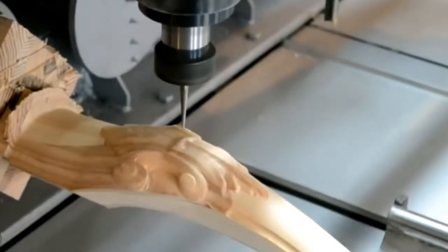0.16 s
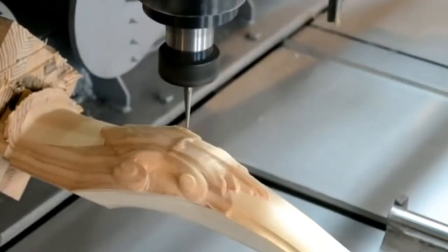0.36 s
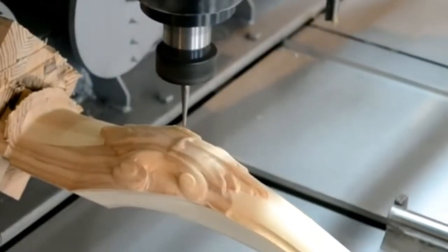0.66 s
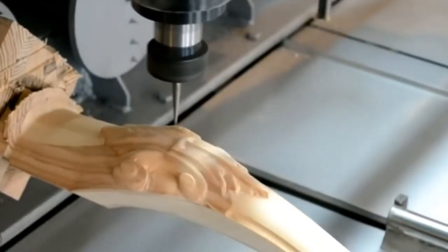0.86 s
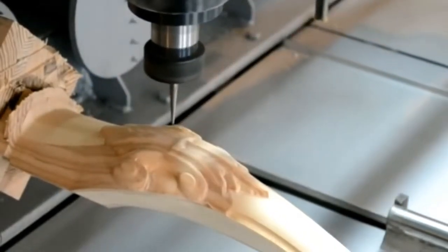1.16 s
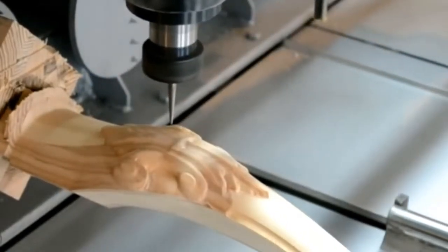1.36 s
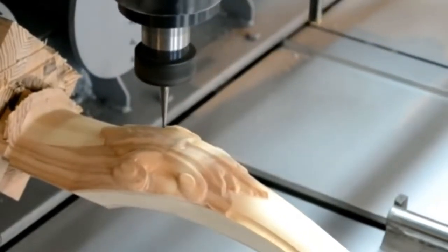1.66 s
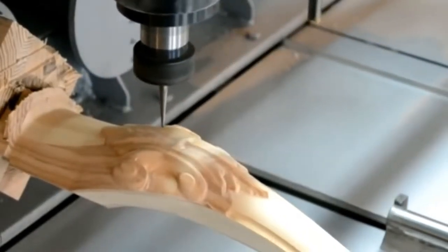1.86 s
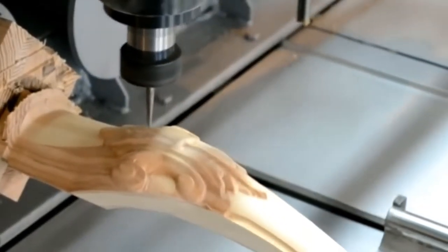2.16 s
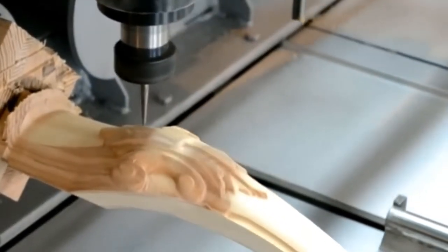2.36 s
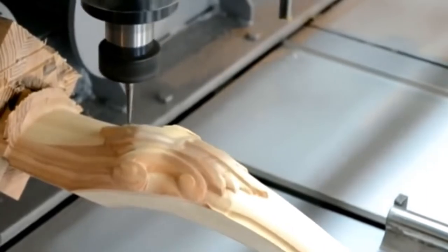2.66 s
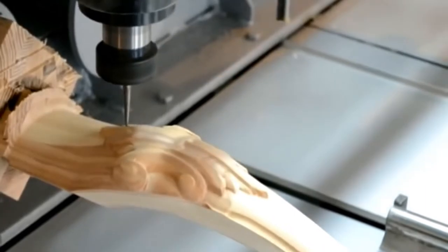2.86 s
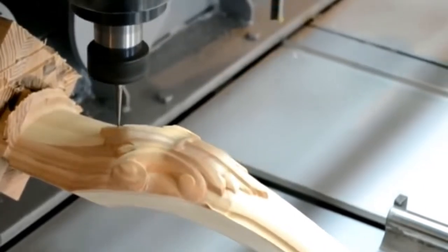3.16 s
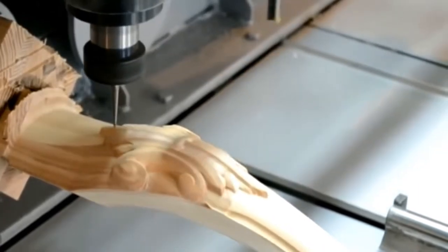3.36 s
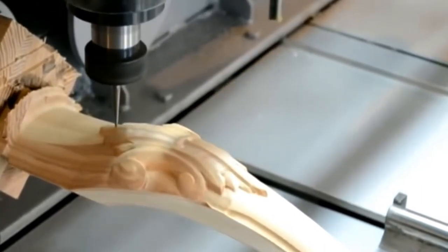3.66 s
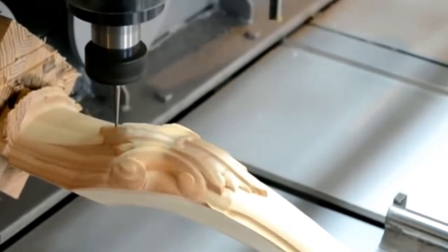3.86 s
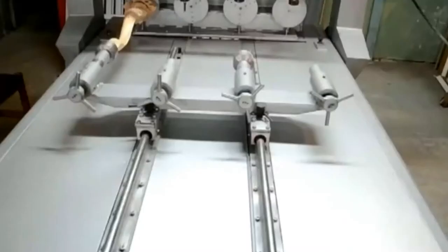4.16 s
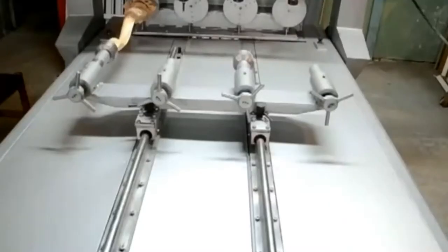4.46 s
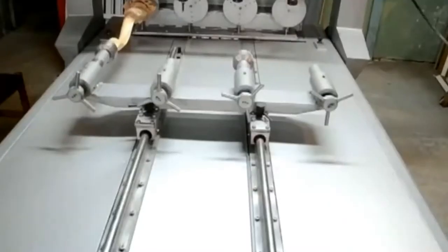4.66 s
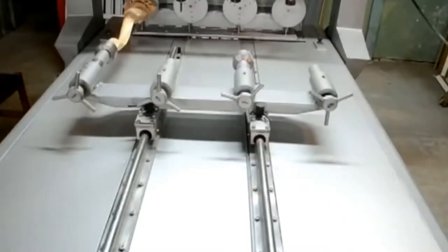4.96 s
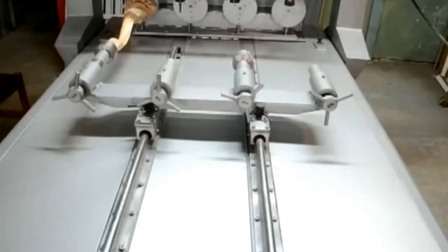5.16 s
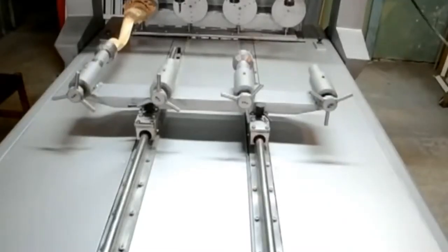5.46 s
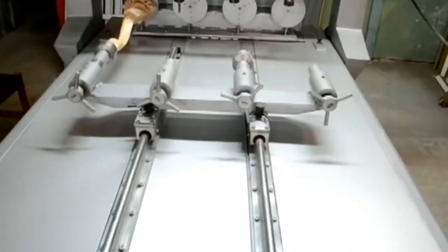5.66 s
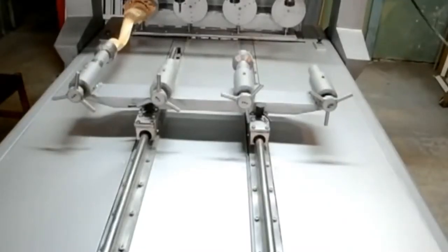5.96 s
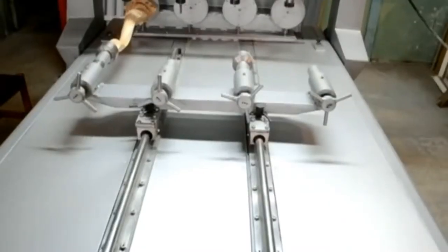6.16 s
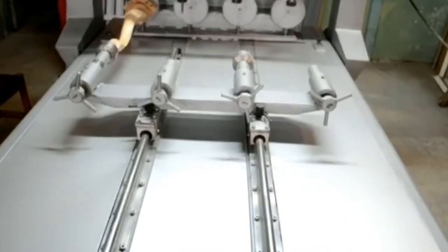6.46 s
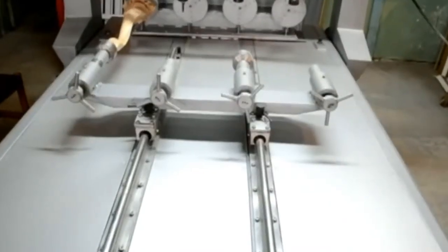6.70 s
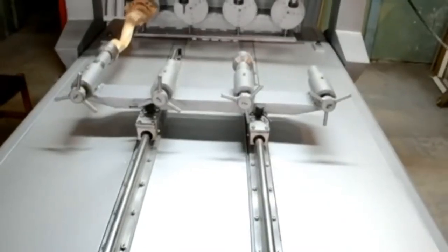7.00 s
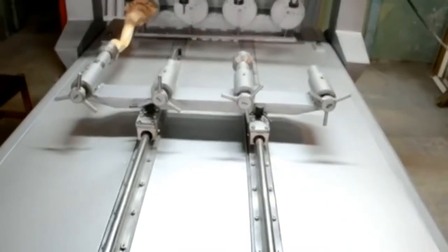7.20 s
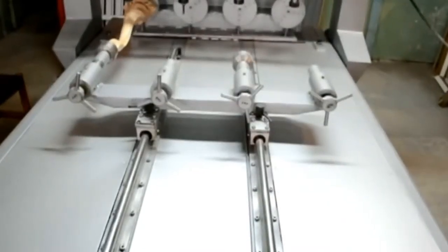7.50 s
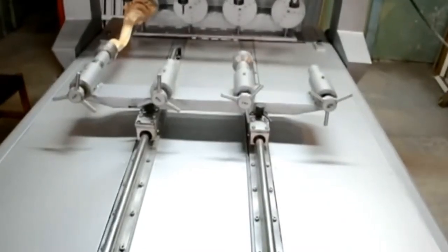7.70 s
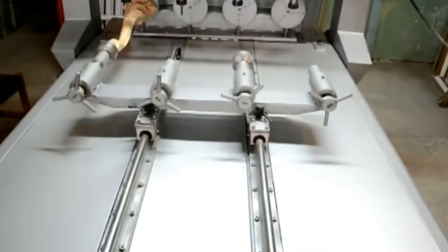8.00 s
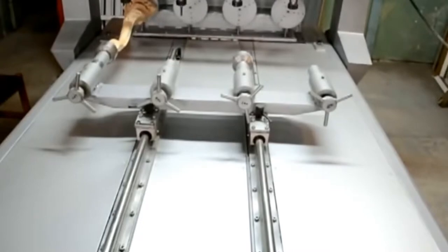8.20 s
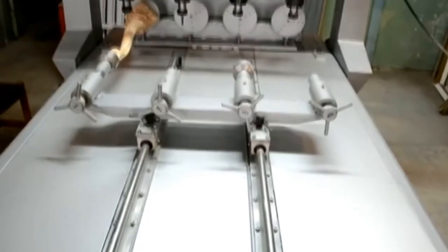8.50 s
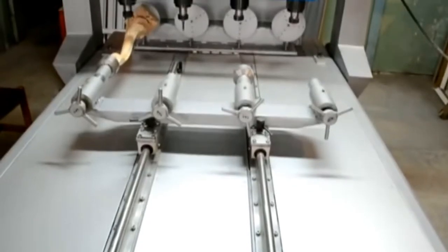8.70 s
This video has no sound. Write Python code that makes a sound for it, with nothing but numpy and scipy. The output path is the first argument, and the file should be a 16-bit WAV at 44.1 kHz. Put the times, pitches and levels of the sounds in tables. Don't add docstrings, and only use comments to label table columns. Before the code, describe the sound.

Steady high machine whine and hissing air with a low early thump, a half-second dropout, a distant scrape, a growing tone and ringing metal.

```python
import sys
import numpy as np
from scipy import signal
from scipy.fft import rfft, irfft, next_fast_len
from scipy.io import wavfile
from scipy.ndimage import uniform_filter1d, map_coordinates

SR = 44100
rng = np.random.default_rng(int(sys.argv[2]) if len(sys.argv) > 2 else 0)


def wrap_up_sound(samples):
    columns = np.atleast_2d(samples).T
    tamed = np.clip(columns, -1, 1)
    steps = np.round(tamed * 32767).astype(np.int16)
    wavfile.write(sys.argv[1], SR, steps)


def rack_gain(trim_db):
    fader = np.asarray(trim_db, float)
    return 10 ** (fader / 20)


N = 389844


def unit(x):
    return x / np.sqrt(np.mean(x ** 2) + 1e-20)


def along(points, hz):
    f, v = np.transpose(points)
    return np.interp(np.log(hz + 1), np.log(f + 1), v)


# start t/s, end t/s, blade-tone beat crest t/s, hum beat crest t/s
VIEWS = [
    (0, 4.45, .058, 2.19),
    (4.45, 9, 7.889, 8.04),
]


def by_view(near, far):
    return np.where(np.arange(N) / SR < VIEWS[0][1], near, far)


def wobble(rate):
    knots = rng.standard_normal(int(N * rate / SR) + 4)
    return map_coordinates(knots, [np.arange(N) * rate / SR])


def filtered(x, response):
    m = next_fast_len(N + 8192)
    return irfft(rfft(x, m) * response(np.fft.rfftfreq(m, 1 / SR)), m)[:N]


def rush(spectrum, patchy_db=0):
    z = signal.stft(rng.standard_normal(N + 512), nperseg=512)[2]
    field = uniform_filter1d(rng.standard_normal(z.shape), size=5, axis=0)
    field = uniform_filter1d(field, size=12, axis=1)
    x = signal.istft(z * rack_gain(patchy_db * unit(field)), nperseg=512)[1][:N]
    return unit(filtered(x, lambda hz: rack_gain(along(spectrum, hz))))


def tone(hz, db, since=0, shaky_db=0):
    level = np.sqrt(2) * rack_gain(db + shaky_db * wobble(12))
    return level * np.sin(2 * np.pi * hz * (np.arange(N) / SR - since))


def dying(events, spectrum, rise):
    t = np.arange(N) / SR
    power = 0
    for s, db, t60, *_ in events:
        after = np.clip(t - s, 0, None)
        power = power + (rack_gain(db - 60 * after / t60) * (1 - np.exp(-after / rise))) ** 2
    return np.sqrt(power) * rush(spectrum, patchy_db=.8)


def add(out, s, sound):
    part = out[round(s * SR):][:len(sound)]
    part += sound[:len(part)]


def swell(pair):
    t = np.arange(N) / SR
    crest_db, depth, crest, period = (by_view(a, b) for a, b in zip(*pair))
    interference = 1 + depth * np.cos(2 * np.pi * (t - crest) / period)
    return crest_db + 20 * np.log10(interference / (1 + depth))


# t/s, level/dB
APPROACH = [
    (4.7, -7),
    (5.25, 5),
    (5.7, -4.5),
    (6, 2),
    (6.9, -1),
    (7.45, 9),
    (8.1, 11.5),
    (8.3, 11),
    (8.55, 14),
]


def approach():
    s, db = np.transpose(APPROACH)
    return by_view(0, np.interp(np.arange(N) / SR, s, db))


SHAFT_HZ, TWIN_HZ = 298.955, 299.67
FIELD_HZ = 299.52
SHORTER_M_PER_DB, SOUND_M_PER_S = .003, 343
OVERTONE_SHARE = .6
# order, near level/dB, far level/dB
ORDERS = [(1, -45.5, -44.5), (3, -61.5, -48), (4, -48.5, -38)]
# crest level/dB, depth (0-1), crest t/s, period/s
BLADE = [(-17.5, .14, 1.17, 2.34), (-32, 0.01, 6.2, 2)]
TWIN = [(-43.5, .3, .3, 4), (-28, .5, 7.4, 4.6)]
OVERTONE = [(-30, .08, 1.6, 2), (-39.5, .25, 6.5, 1.8)]
FLUTE = [(-26.5, .3, 1.9, 5), (-35, .2, 5.3, 3)]
HUM_SWELL = [(-35.5, .75, 3.6, 6), (-39.5, .6, 7.8, 6)]


def spindle():
    blade_crest = by_view(VIEWS[0][2], VIEWS[1][2])
    hum_crest = by_view(VIEWS[0][3], VIEWS[1][3])
    path_lead = SHORTER_M_PER_DB * approach() / SOUND_M_PER_S
    low = sum(tone(k * SHAFT_HZ, by_view(near, far), shaky_db=2.0) for k, near, far in ORDERS)
    hum = tone(2 * SHAFT_HZ, swell(FLUTE), hum_crest, shaky_db=-0.44)
    hum += tone(2 * FIELD_HZ, swell(HUM_SWELL), hum_crest, shaky_db=0.3)
    blades = tone(8 * SHAFT_HZ, swell(BLADE) + approach(), blade_crest - path_lead, shaky_db=.8)
    blades += tone(8 * TWIN_HZ, swell(TWIN), blade_crest, shaky_db=.8)
    overtone = tone(16 * SHAFT_HZ, swell(OVERTONE) + OVERTONE_SHARE * approach(), shaky_db=1.5)
    return low + hum + blades + overtone


CARRIER_HZ = 6000.25
# crest level/dB, depth (0-1), crest t/s, period/s
SIDEBANDS = [
    [(-38, .25, 2.1, 3), (-41.5, .6, 6.2, 3.6)],
    [(-37, .9, 1.2, 4.4), (-37, .35, 5.6, 5.8)],
    [(-31.5, .55, 3.37, 5.2), (-46, .45, 5.4, 5)],
]


def drive():
    sidebands = zip((-2, -1, 1), SIDEBANDS)
    return sum(tone(CARRIER_HZ + k * FIELD_HZ, swell(pair), shaky_db=1.5) for k, pair in sidebands)


AIR_SHARE = 0.088
SINK_DB_PER_S = 0.21
# near level/dB, far level/dB
AIR = [(-18.6, -20), (-24, -27.5), (-28.3, -36)]
# f/Hz, level/dB
ROAR = [(60, -35.5), (150, -26.5), (200, -24.5), (450, -13), (560, -8.5), (750, -3.5), (1000, -6.5),
        (1300, -2), (2000, -3), (2700, -2.5), (3400, -23), (5000, -68.5)]
RASP = [(1500, -54), (2600, -7.5), (3300, -4), (4500, -7), (5500, -9), (7000, -20.5), (9000, -62.5)]
HISS = [(3000, -56), (5000, -11.5), (6200, -0.5), (7500, -1.5), (9000, -3), (16000, 0.5)]
# f/Hz, width/Hz, lift level/dB
NEAR = [(534.6, 19, 10), (716, 84, 7), (1220, 60, 9.5), (1434, 111, 7.5), (1682, 60, 7), (2106, 100, 5),
        (3130, 180, 4.5), (3830, 110, 5.5), (4450, 50, 5), (4620, 90, -4), (4780, 70, 8), (5100, 170, 7),
        (5950, 200, 3), (8830, 350, 0.5)]
FAR = [(706, 24, 7.5), (1237, 60, -0.5), (1467, 240, 7), (1975, 81, 6.5), (2540, 28, 4), (3120, 130, 9),
       (4036, 59, 8), (4530, 70, 5), (4780, 74, -1), (6200, 750, 1), (7330, 110, 6), (9330, 770, 0),
       (11720, 500, 7), (14600, 500, -4)]


def resonances(modes):
    return lambda f: rack_gain(sum(db / (1 + (2 * (f - c) / w) ** 2) for c, w, db in modes))


def air():
    t = np.arange(N) / SR
    moved_db = AIR_SHARE * approach() - by_view(SINK_DB_PER_S * t, 0)
    roar_db, rasp_db, hiss_db = (by_view(near, far) + moved_db for near, far in AIR)
    turn = 2 * np.pi * SHAFT_HZ * t
    chop = 1 + .045 * np.sin(turn) + .04 * np.sin(2 * turn)
    load = wobble(7)
    roar_db = roar_db - 2.0 + .15 * load + 0.6 * wobble(30)
    rasp_db = rasp_db - 1.0 + 0.17 * load + 0.32 * wobble(25)
    hiss_db = hiss_db + 9.0 + 0.71 * load + .6 * wobble(40)
    flow = rack_gain(roar_db) * rush(ROAR, patchy_db=.8)
    flow += rack_gain(rasp_db) * chop * rush(RASP, patchy_db=0.86)
    flow += rack_gain(hiss_db) * chop * rush(HISS, patchy_db=0.45)
    return by_view(filtered(flow, resonances(NEAR)), filtered(flow, resonances(FAR)))


# t/s, length/s, f/Hz, level/dB
SQUEALS = [
    (2.16, 0.044, 4785, -31),
    (2.28, 0.17, 4778, -25),
    (3.456, .04, 4780, -28),
    (3.503, 0.055, 4750, -22),
    (4.87, 0.037, 4760, -27),
    (5.178, .07, 4760, -31),
    (6.638, .08, 4800, -30),
]


def squeals():
    t = np.arange(N) / SR
    out = np.zeros(N)
    for s, length, hz, db in SQUEALS:
        burst = np.cos(np.pi * np.clip((t - s) / length, -.5, .5)) ** .6
        out += burst * tone(hz, db, shaky_db=1.5)
    return out


# t/s, crash level/dB, T60/s, ring level/dB
CLATTER = [
    (7.722, -44, .3, -24.5),
    (8.196, -16, 0.54, -21),
    (8.21, -21, .3, -25),
    (8.235, -16, 0.5, -28),
    (8.26, -19.5, .45, -18),
    (8.283, -24.5, 0.94, -32),
    (8.4, -36, .3, -30),
    (8.648, -22, 0.45, -50),
]
# f/Hz, level/dB
CRASH = [(250, -28), (500, 0), (1000, -1.5), (2500, 0), (5000, 1.5), (9000, -5.5), (15000, -6.5)]
# f/Hz, level/dB, T60/s
HELD = [(4455, -17, .6), (4655, -14, 1.2), (5145, -16, .8), (5222, -10, .08), (7108, 0, .3),
        (8400, -12, .2), (9720, -8, .2), (13020, -16, .2)]


def clatter():
    out = dying(CLATTER, CRASH, rise=0.0018)
    t = np.arange(SR // 2)[:, None] / SR
    hz, level, t60 = np.transpose(HELD)
    for s, _, _, db in CLATTER:
        strength = db + level + 2 * rng.standard_normal(len(hz))
        modes = rack_gain(strength - 60 * t / t60) * np.sin(2 * np.pi * hz * t)
        add(out, s, (modes * (1 - np.exp(-t / 0.0026))).sum(axis=1))
    return out


STRIKE, RING_DB = 8.647, 6.5
# f/Hz, level/dB, T60/s, split f/Hz, partner level/dB, beat crest after the blow t/s
SPANNER = [(2655, -20.5, 2, 17.5, -5, .06), (4640, -20.5, 4, 18.5, -3, .036), (5149, -33, 5, 4, 0, .19),
           (4452, -35, 5, 2.5, 0, .2), (4622, -23, .15, 20, -6, .005), (7108, -18.5, 2.5, 3, -3, .045),
           (8420, -24.5, 4, 3.5, -3, .13), (8402, -31, 1, 30, -3, .037), (9375, -37, 3, 19, 0, .04),
           (9706, -32, 1, 29, 0, .02), (9762, -41, 1, 30, -6, .02), (9911, -34, 2, 8, -4, .1),
           (10955, -30, 2, 53, 1, .01), (12321, -22, 4, 4, -4, .12), (13050, -31, 2, 6, -4, .1),
           (13650, -30, 1, 20, -4, .03), (14900, -33, 1, 10, -4, .03)]
# t/s, level/dB, T60/s
SHIMMER = [
    (STRIKE, -24, 3),
]
# f/Hz, level/dB
SHIMMER_TONE = [(6000, -40), (9000, -12), (11000, -4), (14000, 0), (16000, 0)]


def free_spanner():
    out = dying(SHIMMER, SHIMMER_TONE, rise=.01)
    t = np.arange(SR // 2)[:, None] / SR
    hz, level, t60, split, partner, crest = np.transpose(SPANNER)
    pair = np.sin(2 * np.pi * hz * (t - crest))
    pair += rack_gain(partner) * np.sin(2 * np.pi * (hz + split) * (t - crest))
    tumble_db = 1.7 * np.transpose([wobble(70)[:len(t)] for _ in hz])
    ring = rack_gain(RING_DB + level + tumble_db - 60 * t / t60) * pair
    add(out, STRIKE, (ring * (1 - np.exp(-t / .014))).sum(axis=1))
    return out


# t/s, level/dB, T60/s
THUMPS = [
    (.182, -23, 0.99),
    (.28, -23.5, 0.64),
    (.336, -31.5, .8),
]
# f/Hz, level/dB
BOARD = [(40, -51), (110, -17), (190, -1), (330, -1), (700, 0), (1000, -20), (2500, -51)]
# f/Hz, level/dB, T60/s
KNOCK = [(185, -22, .35), (310, -22, .25), (470, -27, .2), (690, -22, .25)]


def board():
    out = dying(THUMPS, BOARD, rise=0.0022)
    t = np.arange(SR // 2) / SR
    modes = sum(rack_gain(db - 60 * t / t60) * np.sin(2 * np.pi * hz * t) for hz, db, t60 in KNOCK)
    add(out, THUMPS[0][0], modes * (1 - np.exp(-t / 0.0028)))
    return out


# t/s, level/dB, T60/s
DULL_BLOWS = [
    (5.92, -15.5, 0.55),
    (5.97, -18.5, 0.55),
    (6.04, -32, .6),
    (8.196, -17, 1),
    (8.27, -23, .8),
    (8.4, -33, .9),
]
# f/Hz, level/dB
DULL_BLOW = [(150, -30), (400, -4.5), (1000, -2), (2200, 3.5), (3500, -7), (6000, -11), (9000, -39.5)]


def dull_blows():
    return dying(DULL_BLOWS, DULL_BLOW, rise=0.013)


# t/s, level/dB, T60/s
RUMBLES = [
    (-1, -54, 300),
    (-.2, -35, 2.5),
    (4.5, -41, 3),
    (5.55, -45, 6),
    (7.05, -39, 2.7),
    (7.5, -38.5, 4.5),
    (8, -38, 2.7),
]
# f/Hz, level/dB
RUMBLE_TONE = [(25, -37), (80, -25), (150, -12), (220, -1.5), (320, -1.5), (600, -32), (1200, -64)]
# t/s, level/dB, T60/s, f/Hz
BOOMS = [
    (0, -29.5, 2.2, 315),
    (4.72, -46, 2, 150),
]


def hall():
    out = dying(RUMBLES, RUMBLE_TONE, rise=.1)
    for boom in BOOMS:
        hz = boom[3]
        out += dying([boom], [(hz / 3, -70), (hz, 0), (3 * hz, -70)], rise=.002)
    return out


DUCK_ATTACK_S = .02
# t/s, depth level/dB, release/s
DUCKS = [
    (8.22, 3.5, .15),
    (8.66, 7, 1.5),
]


def gain_control():
    depth_db = np.zeros(N)
    for s, db, release in DUCKS:
        after = np.clip(np.arange(N) / SR - s, 0, None)
        depth_db += db * (1 - np.exp(-after / DUCK_ATTACK_S)) * np.exp(-after / release)
    return rack_gain(-depth_db)


def gated_treble(x, above_hz, under_db):
    hz, _, z = signal.stft(x, SR, nperseg=2048)
    band = np.arange(len(hz)) // 16
    power = np.add.reduceat(abs(z) ** 2, np.arange(0, len(hz), 16))
    fickle_db = under_db + 1.5 * rng.standard_normal(power.shape)
    keep = (power > power.sum(axis=0) * rack_gain(2 * fickle_db))[band]
    keep = keep | (hz[:, None] < above_hz)
    return signal.istft(z * keep, SR, nperseg=2048)[1][:N]


CUT_S, RESUME_S, FADE_OUT_S, FADE_IN_S = 4.1942, 4.6968, .0023, .0008
EDGE_DB, TAIL_STEP_S, TAIL_SAG_DB_PER_S, TAIL_STEP_DB, LEAD_IN_S = -27, .026, 270, -25, .052


def muted():
    t = np.arange(N) / SR
    after, before = t - CUT_S, RESUME_S - t
    gate = np.clip(1 - after / FADE_OUT_S, 0, 1) ** 2 + np.clip(1 - before / FADE_IN_S, 0, 1)
    tail_db = EDGE_DB - TAIL_SAG_DB_PER_S * abs(after) + TAIL_STEP_DB * (after > TAIL_STEP_S)
    tail = rack_gain(tail_db) * (after < 2 * TAIL_STEP_S)
    lead_in = rack_gain(EDGE_DB) * np.cos(np.pi / 2 * np.clip(before / LEAD_IN_S, 0, 1)) ** 2
    return np.maximum(gate, tail + lead_in * (after > 0))


def scene():
    machine = spindle() + drive() + air() + squeals()
    mono = machine + clatter() + free_spanner() + board() + dull_blows() + hall()
    return np.array([mono, mono])


def roll_off(x):
    return signal.sosfilt(signal.butter(12, 15180, fs=SR, output="sos"), x)


# f/Hz, level/dB
MIC = [(20, -2), (7300, 0.5), (7900, -3.5), (8700, 3), (10000, -1), (10900, -10.5), (11200, -19.5),
       (11400, -28), (11600, -38), (11900, -35.5), (12300, -26.5), (13000, -20), (14200, -23.5),
       (15100, -33.5)]


def record(dry):
    mono = filtered(dry[0] * gain_control(), lambda hz: rack_gain(along(MIC, hz)))
    mono = gated_treble(mono, above_hz=7000, under_db=-57.5) * muted()
    return roll_off(np.array([mono, mono]))


dry = scene()
out = record(dry)
wrap_up_sound(out)
```